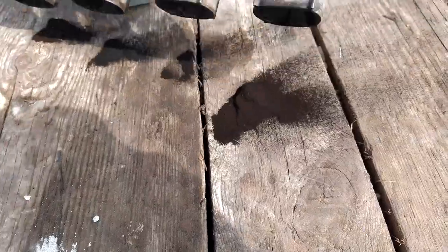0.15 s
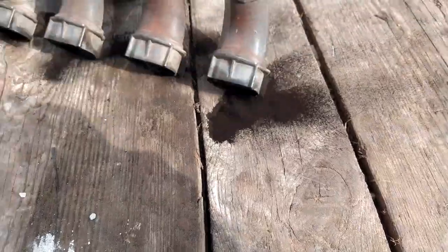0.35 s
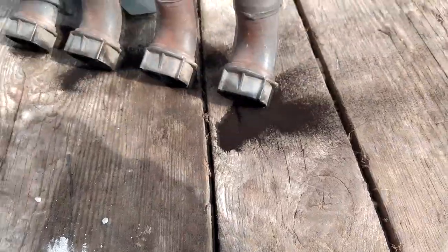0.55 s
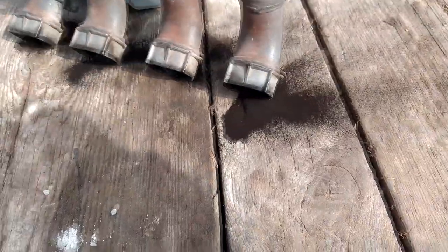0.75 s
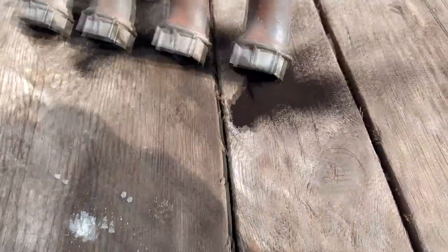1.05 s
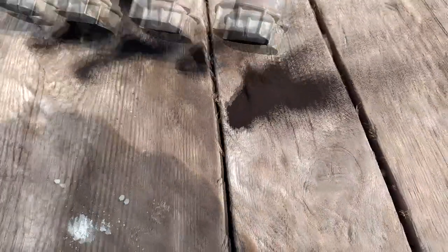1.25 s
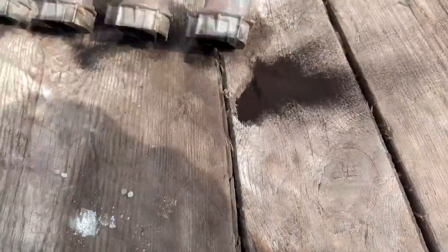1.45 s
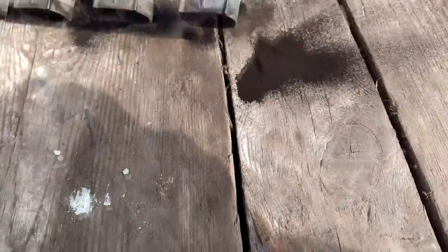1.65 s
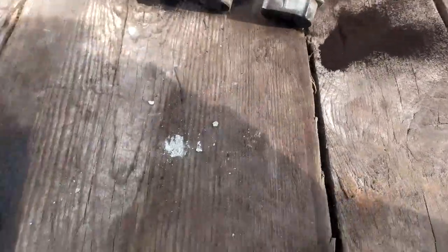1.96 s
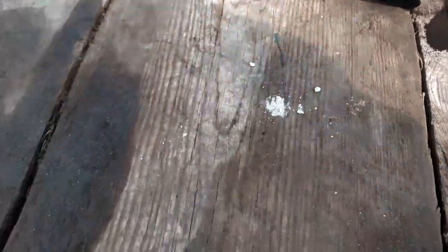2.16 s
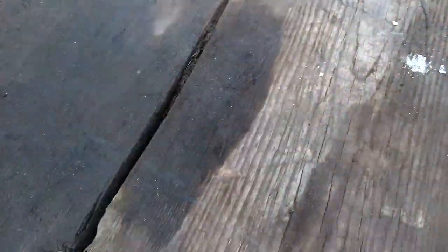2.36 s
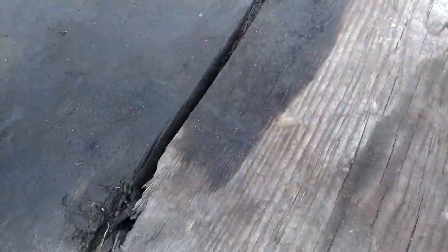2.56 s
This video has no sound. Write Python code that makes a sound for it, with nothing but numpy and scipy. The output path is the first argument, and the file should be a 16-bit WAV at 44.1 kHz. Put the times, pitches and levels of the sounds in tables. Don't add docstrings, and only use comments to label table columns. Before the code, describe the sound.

Joined metal pipes strike a board floor with bright, short clanks, rattling caps and dull wood thuds; a brief opening flurry, near quiet, then about a second of hard knocks, recorded close by in open air.

```python
import sys
import numpy as np
from scipy import signal
from scipy.fft import rfft, irfft
from scipy.io import wavfile
from scipy.ndimage import uniform_filter1d

SR = 44100
rng = np.random.default_rng(int(sys.argv[2]) if len(sys.argv) > 2 else 0)


def to_linear_factor(level_db):
    exponent = np.asarray(level_db, float) / 20
    return 10 ** exponent


def pcm_store(signal):
    levels = np.round(np.clip(np.atleast_2d(signal), -1, 1) * 32767)
    wavfile.write(sys.argv[1], SR, levels.astype(np.int16).T)


N = 119070


def shape(table, hz):
    f, db = np.array(table).T
    return to_linear_factor(np.interp(np.log(np.maximum(hz, 1)), np.log(f), db, left=-70, right=-70))


def colour(x, table):
    size = x.shape[-1]
    return irfft(rfft(x) * shape(table, np.fft.rfftfreq(size, 1 / SR)), size)


def unit(x):
    return x / np.sqrt(np.mean(x ** 2))


def energy(x):
    return x / np.sqrt(np.sum(x ** 2) / len(x))


def noise(table, size):
    return unit(colour(rng.standard_normal(size), table))


def ring(hz, gain, t60_s, phase, size=16000, rise_s=1e-5):
    t = np.arange(size) / SR
    decay = np.exp(-np.log(1000) * t / t60_s[:, None])
    modes = gain[:, None] * decay * np.sin(2 * np.pi * hz[:, None] * t + phase[:, None])
    return (1 - np.exp(-t / rise_s)) * modes.sum(axis=0)


def walk(rate_hz):
    k = int(SR / rate_hz)
    steps = np.repeat(rng.standard_normal(N // k + 1), k)[:N]
    return 1.13 * uniform_filter1d(uniform_filter1d(steps, k), k)


# [f/Hz, level/dB]
STRONG_MODES = [(775, -34.5), (905, -14.5), (1225, -9), (1485, -8), (1845, -6), (2130, -31), (2250, -7.5),
                (2720, 2.5), (2848, -11), (3190, -7), (6700, -5.5), (7600, -13.5), (8270, -2.5),
                (9300, -6.5)]
# [f/Hz, level/dB per Hz]
STEEL_SPECTRUM = [(400, -26.5), (800, -7.5), (1100, -14.5), (2250, 2), (3150, -1), (3750, -8), (9200, -1.5),
                  (16000, -39.5)]
STEEL_T60_S, TREBLE_T60_S = .11, .075
CRACK_S, CRACK_DB = .0025, -6
STRONG_DB, STRONG_LUCK_DB, STRONG_T60_S = -5.5, 3, 0.08


def pipe_body(count, size=5000):
    where, strength, life, left, right, right2 = rng.random((6, count))
    hz = 550 + 14600 * ((np.arange(count) + where) / count) ** 1.4
    t60_s = np.interp(hz, [2000, 9000], [STEEL_T60_S, TREBLE_T60_S]) * (0.45 + 1.02 * life ** 2)
    gain = shape(STEEL_SPECTRUM, hz) * (hz / 8000) ** (1 / 7) / np.sqrt(t60_s)
    gain = gain * to_linear_factor(19.4 * (strength - .5))
    apart = np.clip(hz / 1200, 0, 1) * ((right + right2 - 1) * 1.03 + 0.21)
    crowd = energy(np.array([ring(hz, gain, t60_s, 2 * np.pi * p, size) for p in (left, left + apart)]))

    f, db = np.array(STRONG_MODES).T
    tune, level, lag = rng.standard_normal((3, len(f)))
    f_hz = f * (1 + 0.0094 * tune)
    strong_gain = to_linear_factor(db + STRONG_LUCK_DB * level)
    strong = energy(np.array([ring(f_hz, strong_gain, STRONG_T60_S + 0 * f, p * lag, size) for p in (0, 1.5)]))

    fade = np.exp(-np.arange(size) / SR / CRACK_S)
    crack = energy(np.array([noise(STEEL_SPECTRUM, size) * fade for _ in range(2)]))
    return energy(crowd + to_linear_factor(STRONG_DB) * strong + to_linear_factor(CRACK_DB) * crack)


# [t/s, blow peak level/dB, chatter length/s, chatter level/dB]
KNOCKS = [(.001, -36, .012, -31.5), (0.0194, -14, 0.045, -36.5), (0.166, -39, 0.06, -41.5),
          (0.2221, -2.5, 0.0033, -15), (0.244, -16, 0.031, -8.5), (0.294, -9, 0.093, -12.5),
          (0.5043, -18.5, .004, -37), (0.616, -32.5, 0.0043, -39.5), (1.079, -41.5, 0.018, -54),
          (1.358, -43, 0.046, -47), (1.401, -21.5, 0.0092, -36), (1.418, -1, 0.046, -13),
          (1.472, -6, 0.081, -8.5), (1.5956, -6.5, 0.15, -15), (1.655, -18, 0.011, -9.5),
          (1.697, -10, .12, -12), (1.831, -3, 0.021, -13.5), (1.896, -11, 0.007, -14),
          (1.936, -18, 0.061, -19), (2.021, -1, 0.061, -13.5), (2.0514, -7, 0.02, -12.5),
          (2.118, -26.5, 0.027, -18.5), (2.159, -24, 0.017, -10), (2.195, -44, 0.041, -10),
          (2.262, -19, 0.024, -19.5), (2.33, -22, 0.055, -24.5), (2.367, -14, 0.015, -17),
          (2.386, -1, 0.016, -12.5), (2.474, -47, 0.073, -47.5), (2.68, -53, 0.022, -49)]
# [t/s, peak level/dB]
TAPS = [(0.227, -11), (0.2575, 1), (.27, -17), (.31, -7), (0.328, 0), (0.356, -7), (.37, -7), (.408, -9),
        (1.422, -2), (1.431, -7), (1.438, -5), (1.53, -13), (1.543, -28), (1.611, -14), (1.676, -5),
        (1.73, -4.5), (1.737, -1), (1.762, -3), (1.779, 0), (1.846, -10), (1.93, -19), (1.954, -18),
        (2.008, -11), (2.025, -2.5), (2.068, -1), (2.108, -0.5), (2.18, -8.5), (2.22, -2), (2.236, -19.5),
        (2.249, -3), (2.285, -1), (2.388, -4), (2.399, -6)]
PIPE_PAN_DB = [-3, 0.7, 3, 5]
# [f/Hz, level/dB]
MIC_COLOUR = [(100, 5), (3600, -1), (5100, -4), (6600, 0), (10300, 1), (11200, -2), (13000, 4),
              (16500, -10)]
# [t/s, left minus right level/dB]
SWAY = [(0, -3), (.22, -.5), (.45, -5), (1.4, -3.5), (1.6, -0.5), (1.9, -3), (2.1, -4.5), (2.3, -2),
        (2.7, 0.5)]
BLOW_DB, BLOW_S, TAP_DB = 4, 0.0013, -1
CHATTER_PER_S, CHATTER_SCATTER_DB, RELEASE_S = 500, 4, 0.026
PIPE_LUCK_DB, SHIFT_DB, SHIFT_PER_S = 7, 6, 36
UNSHARED = .25


def pipes():
    t, out = np.arange(N) / SR, 0
    luck = to_linear_factor(PIPE_LUCK_DB * rng.standard_normal((len(KNOCKS) + len(TAPS), 4)))
    luck /= np.sqrt(np.sum(luck ** 2, axis=1, keepdims=True))
    wander = to_linear_factor(SHIFT_DB * np.array([walk(SHIFT_PER_S) for _ in PIPE_PAN_DB]))
    wander /= np.sqrt(np.mean(wander ** 2, axis=0))
    for k, pan_db in enumerate(PIPE_PAN_DB):
        power, blows = np.zeros(N), np.zeros(N)
        for (s, blow_db, hold_s, db), share in zip(KNOCKS, luck[:, k]):
            release = np.exp(-2 * np.maximum(t - s - hold_s, 0) / RELEASE_S)
            power += (share * to_linear_factor(db)) ** 2 * (t >= s) * release
            blows += share * to_linear_factor(blow_db + BLOW_DB) * (t >= s) * np.exp(-np.abs(t - s) / BLOW_S)
        for (s, db), share in zip(TAPS, luck[len(KNOCKS):, k]):
            i = int(s * SR)
            blows[i:i + 400] += share * to_linear_factor(db + TAP_DB) * np.exp(-t[:400] / BLOW_S)
        chance, sign, flip = rng.random((3, N))
        click_gain = to_linear_factor(CHATTER_SCATTER_DB * np.minimum(rng.exponential(size=N), 3))
        clicks = unit((chance < CHATTER_PER_S / SR) * np.sign(sign - .5) * click_gain) * wander[k]
        at_ports = clicks * np.array([np.ones(N), np.sign(flip - UNSHARED)])
        force = at_ports * np.sqrt(power) + blows * rng.standard_normal(N)
        pan = to_linear_factor(np.array([[pan_db], [-pan_db]]) / 2)
        out = out + signal.fftconvolve(force, pipe_body(count=85), axes=1)[:, :N] * pan
    sway_db = np.interp(t, *np.array(SWAY).T)
    return colour(out, MIC_COLOUR) * to_linear_factor(np.array([sway_db, -sway_db]) / 2)


# [t/s, f/Hz, level/dB, t60/s]
SINGING = [(.0, 505, -60, 3.9), (.223, 2240, -28.5, 0.13), (0.329, 2786, -22, 0.31), (.36, 2260, -52, 1.15),
           (.36, 4020, -57, 1.16), (.504, 7040, -28.5, 0.036), (.617, 8600, -38, 0.07),
           (0.618, 6000, -37, 0.058), (.504, 8700, -47, 0.06), (0.019, 2380, -28.5, 0.07),
           (0.017, 3180, -33, 0.096), (.018, 1470, -32, 0.053), (0.259, 1780, -14, 0.085),
           (1.675, 8220, -9, .06), (2.165, 9050, -18.5, 0.35), (2.055, 7030, -29, .08),
           (2.33, 2060, -32, 0.069), (1.42, 2606, -21, 0.23), (1.43, 1495, -18, 0.18),
           (1.48, 928, -26.5, 0.19), (1.51, 2970, -28, 0.5), (1.545, 774, -30, 0.55), (1.6, 906, -32.5, .4),
           (1.76, 952, -29.5, 0.22), (2.17, 869, -33.5, .4), (1.56, 8270, -28, 0.41),
           (1.6, 6180, -27.5, 0.31), (1.72, 2370, -23, 0.14), (1.83, 1446, -18.5, 0.1),
           (1.929, 6160, -30, 0.32), (1.93, 1840, -20, 0.19), (1.94, 2307, -26, 0.32),
           (2.02, 885, -28.5, 0.17), (2.095, 7780, -18.5, 0.41), (2.1, 2245, -10, 0.08),
           (2.24, 2845, -27.5, 0.72), (2.285, 8040, -31, 0.48), (2.382, 2820, -21, 0.36),
           (2.382, 3157, -22.5, 0.33), (2.382, 7600, -14.5, 0.16), (2.39, 1242, -23.5, 0.19)]
TWIN_T60_SHARE, TWIN_DB = .6, -9.


def singing():
    size = 30000
    out = np.zeros((2, N + size))
    for (s, hz, db, t60_s), luck in zip(SINGING, rng.standard_normal((len(SINGING), 3))):
        grip = np.exp(-2 * (np.arange(size) / SR / t60_s) ** 2)
        pair_hz = hz * np.array([1, 1 + 0.002 * luck[0]])
        gain = to_linear_factor(db + 7 + np.array([0, TWIN_DB]))
        pair_t60_s = np.array([t60_s, TWIN_T60_SHARE * t60_s])
        i = int(s * SR)
        for c in range(2):
            phase = c * (1.4 + .5 * luck[1:])
            out[c, i:i + size] += ring(pair_hz, gain, pair_t60_s, phase, size, rise_s=0.0047) * grip
    return out[:, :N]


# [t/s, level/dB, first pitch f/Hz]
THUDS = [(0.197, -32.5, 254), (0.2464, -5.5, 686), (0.321, -22.5, 160), (0.512, -42, 215),
         (0.655, -39, 413), (0.735, -32, 320), (0.769, -37, 260), (.88, -40, 200), (0.999, -38, 300),
         (1.16, -40.5, 338), (1.307, -39.5, 412), (1.416, -11, 454), (1.529, -32, 195), (1.694, -12.5, 300),
         (1.83, -20, 300), (2.239, -20.5, 360), (2.388, -36, 359), (2.685, -27, 300)]
# [f/Hz, level/dB, t60/s]
BOARD_MODES = [(113.5, 5, 0.23), (160, 12, 0.2), (212, 0, 0.05), (300, -1, 0.26), (570, -5, 0.043)]
PLANK_REST_HZ, PLANK_SAG_S, PLANK_RISE_S, PLANK_FALL_S = 179.3, 0.0035, 0.00041, 0.016
PLANK_TOP_SHARE, PLANK_TOP_S, BOARD_DB = 0.92, 0.003, -17.5


def boards():
    f, db, t60_s = np.array(BOARD_MODES).T
    size = 16000
    t = np.arange(size) / SR
    out, luck = np.zeros((2, N + size)), rng.standard_normal((len(THUDS), 3, len(f)))
    envelope = (1 - np.exp(-t / PLANK_RISE_S)) * np.exp(-(t / PLANK_FALL_S) ** 2)
    for (s, level_db, hz), (tune, level, lag) in zip(THUDS, luck):
        sag_turns = (0.74 * hz - PLANK_REST_HZ) * PLANK_SAG_S * (1 - np.exp(-t / PLANK_SAG_S))
        turns = PLANK_REST_HZ * t + sag_turns
        top = PLANK_TOP_SHARE * np.exp(-t / PLANK_TOP_S) * np.sin(2 * np.pi * 0.841 * hz * t)
        gain = to_linear_factor(BOARD_DB + db + 3 * level)
        i = int(s * SR)
        for c in range(2):
            wave = -(np.sin(2 * np.pi * turns + 0.84 * c) + top) * envelope
            modes = ring(f * (1 + .03 * tune), gain, t60_s, 3 * tune + .7 * c * lag, size, rise_s=.004)
            out[c, i:i + size] += to_linear_factor(level_db - 0.3 * c) * (wave + modes)
    return out[:, :N]


# [t/s, length/s, level/dB]
SCUFFS = [(0.177, 0.076, -38), (0.276, 0.13, -22.5), (0.425, 0.077, -41), (1.451, 0.095, -26.5),
          (1.692, 0.16, -24.5), (1.55, 0.04, -39), (2.05, 0.045, -34), (2.253, 0.069, -39),
          (2.396, 0.058, -38), (2.489, 0.11, -44)]
GRAINS_PER_S = 2500


def scuffs():
    t, level = np.arange(N) / SR, 0
    for s, hold_s, db in SCUFFS:
        rise = np.clip((t - s) / 0.0053, 0, 1)
        level = level + to_linear_factor(db) * rise * np.exp(-np.maximum(t - s - hold_s, 0) / 0.015)
    grains = (rng.random(N) < GRAINS_PER_S / SR) * rng.standard_normal(N) * level
    hz = 230 * 13 ** rng.random(30)
    gain, t60_s = (hz / 400) ** 0.071, 0.065 + 0 * hz
    wood = energy(np.array([ring(hz, gain, t60_s, c * hz / 500 * rng.standard_normal(30), size=3000)
                            for c in range(2)]))
    return np.sqrt(SR / GRAINS_PER_S) * signal.fftconvolve(grains[None], wood)[:, :N]


YARD_T60_S, YARD_DB = .22, -20


def yard(steel):
    decay = np.exp(-np.log(1000) * np.arange(20000) / SR / YARD_T60_S)
    tail = energy(rng.standard_normal((2, 20000)) * decay)
    return to_linear_factor(YARD_DB) * signal.fftconvolve(steel, tail, axes=1)[:, :N]


# [f/Hz, level/dB per Hz]
WIND_SPECTRUM = [(12, -40), (20, 4.5), (97, 1), (184, -4.5), (210, -11.5), (304, -15.5), (497, -30),
                 (700, -39), (910, -74), (1540, -120)]
# [t/s, level/dB]
GUST = [(0, 7.5), (.25, 10), (.6, 10.5), (0.751, 10.5), (.9, 5.5), (1.3, 7.5), (1.85, 11), (2.0, 3.5),
        (2.7, -4.5)]
WIND_DB = -47.5


def wind():
    gust_db = np.interp(np.arange(N) / SR, *np.array(GUST).T)
    both = noise(WIND_SPECTRUM, N) * to_linear_factor(2.7 * walk(31.0))
    own = np.array([noise(WIND_SPECTRUM, N) * to_linear_factor(2.9 * walk(32.98)) for _ in range(2)])
    return to_linear_factor(WIND_DB + gust_db) * (.5 * both + 0.98 * own)


# [f/Hz, level/dB per Hz]
HISS_SPECTRUM = [(290, -64), (500, -10.5), (1260, -13), (2430, -13), (2730, -15), (5470, -14),
                 (6330, -14.5), (9360, -3.5), (16000, -32)]
HISS_DB = -51.5
TRICKLE_S, TRICKLE_WIDTH_S, TRICKLE_DB = .95, 0.042, 8


def hiss():
    air = np.array([noise(HISS_SPECTRUM, N) for _ in range(2)])
    low = signal.lfilter(*signal.butter(2, 2500, fs=SR), air)
    high = signal.lfilter(*signal.butter(2, 6500, "high", fs=SR), air)
    middle = air - low - high
    trickle_db = TRICKLE_DB * np.exp(-((np.arange(N) / SR - TRICKLE_S) / TRICKLE_WIDTH_S) ** 4)
    low = to_linear_factor(4.1 * walk(11.0)) * low
    middle = to_linear_factor(2.0 * walk(13.04) + trickle_db) * middle
    high = to_linear_factor(0.61 * walk(5.5) + trickle_db) * high
    return to_linear_factor(HISS_DB) * (low + middle + high)


def scene():
    steel = pipes() + singing()
    return steel + yard(steel) + boards() + scuffs() + wind() + hiss()


def low_pass(x):
    return signal.sosfilt(signal.butter(12, 16380, fs=SR, output="sos"), x)


SQUEEZE_DB, SQUEEZE, TOP_HZ = -12, 0.35, 15500


def record(dry):
    power = uniform_filter1d(np.mean(dry ** 2, axis=0), size=500)
    loudness = np.sqrt(np.abs(power) + 1e-12)
    held = dry * np.minimum(to_linear_factor(SQUEEZE_DB) / loudness, 1) ** SQUEEZE
    mix = signal.sosfilt(signal.butter(4, TOP_HZ, fs=SR, output="sos"), np.tanh(held))
    return low_pass(mix)


dry = scene()
out = record(dry)
pcm_store(out)
```